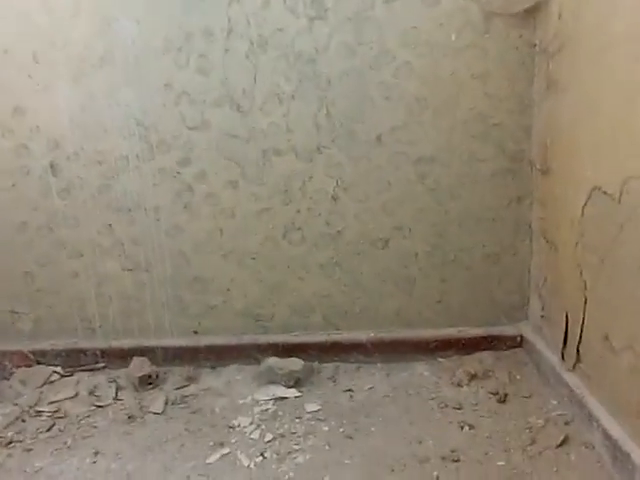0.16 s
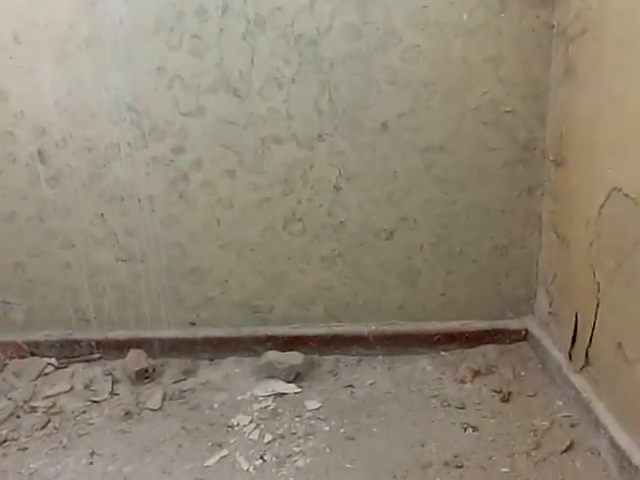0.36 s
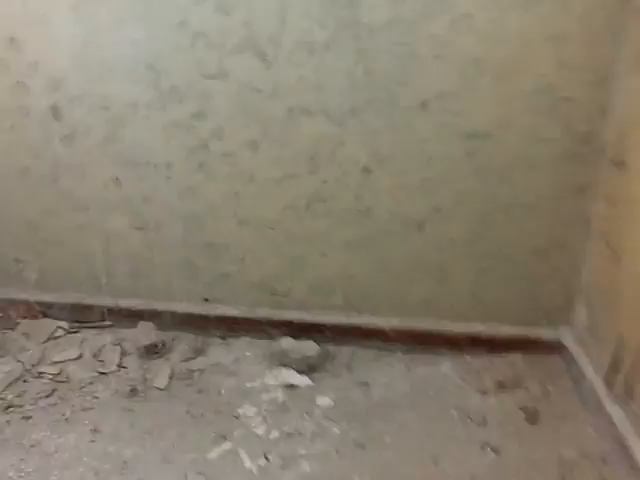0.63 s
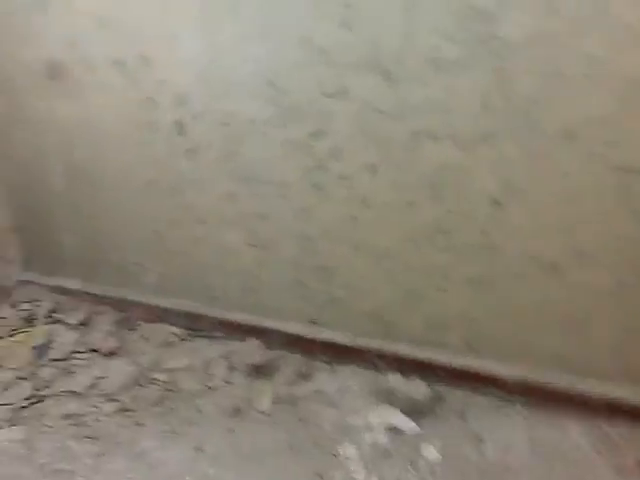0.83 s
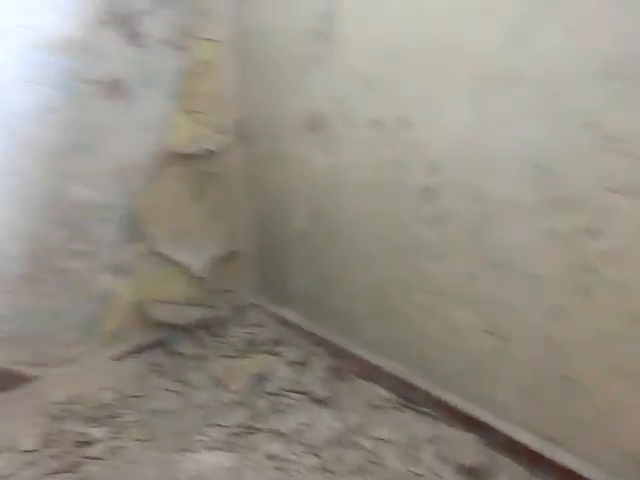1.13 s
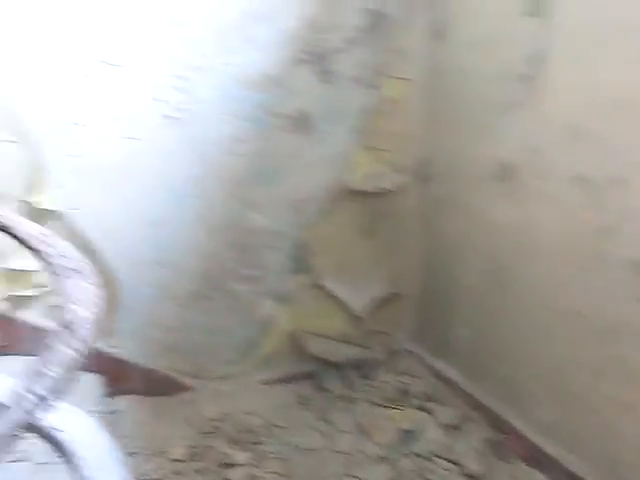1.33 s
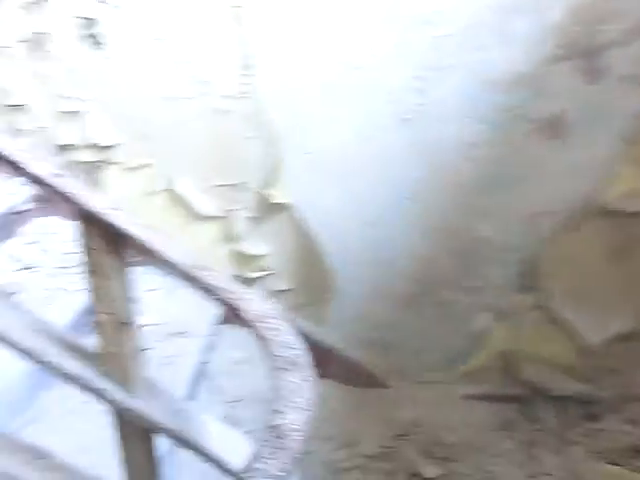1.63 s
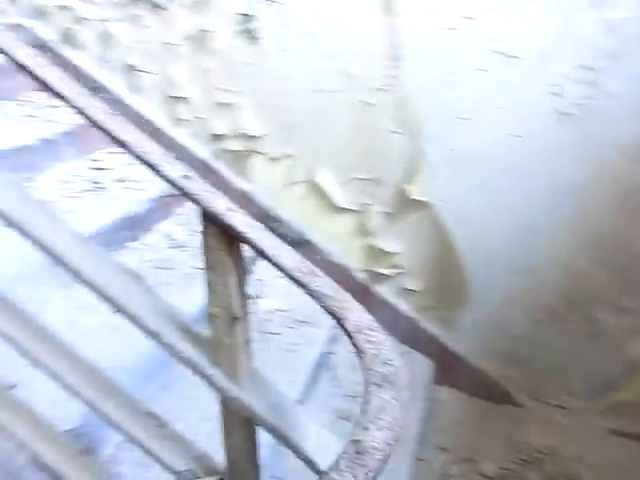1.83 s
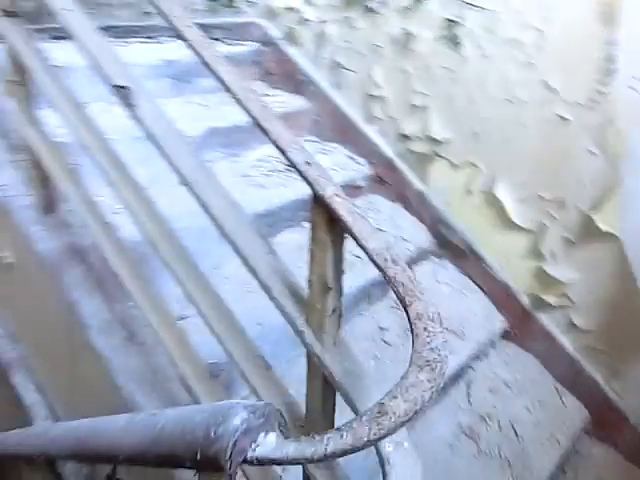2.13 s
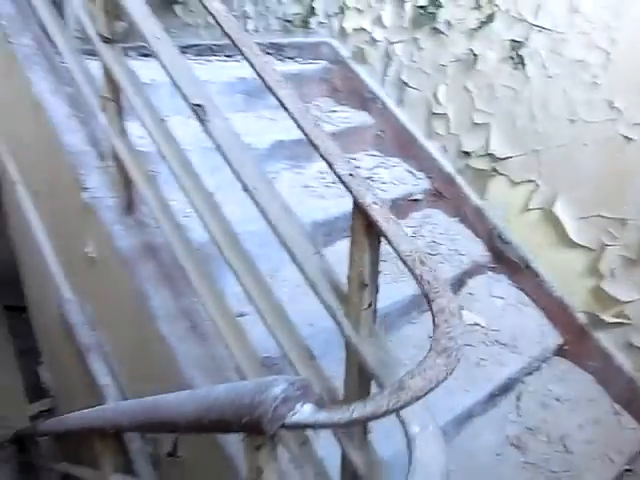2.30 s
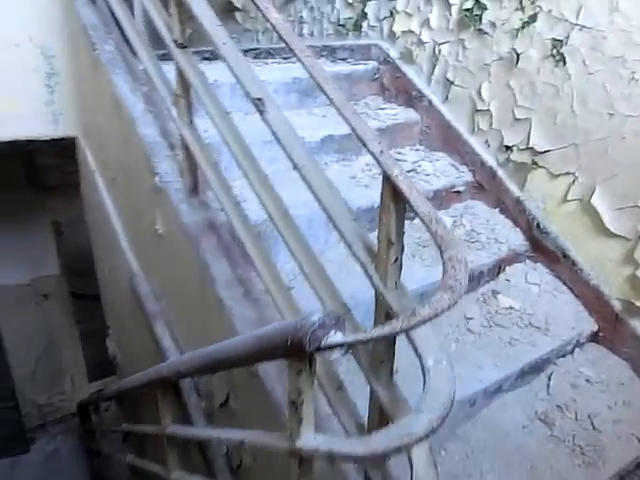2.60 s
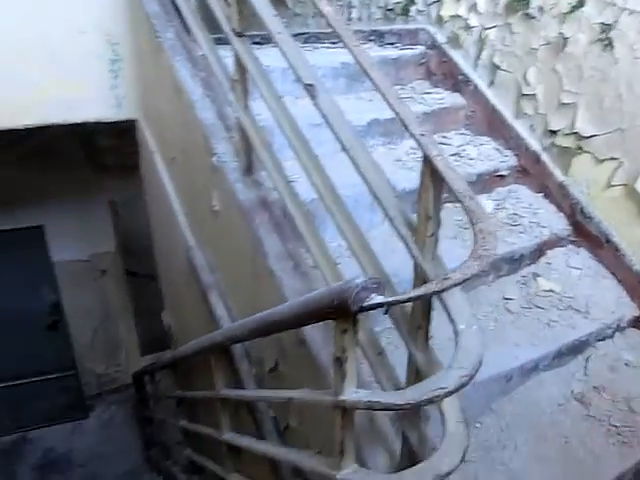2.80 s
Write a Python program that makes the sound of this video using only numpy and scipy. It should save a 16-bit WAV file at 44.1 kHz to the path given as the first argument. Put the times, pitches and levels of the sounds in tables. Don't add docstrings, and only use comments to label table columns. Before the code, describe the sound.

Footsteps on plaster debris: a sharp knock and crunch, a softer tread, then two louder crunching steps, with a bright sleeve swish and tiny squeaks between them, heard close by a handheld stereo microphone in an empty stairwell.

```python
import sys
import numpy as np
from scipy import signal
from scipy.fft import rfft, irfft
from scipy.io import wavfile

SR = 44100
rng = np.random.default_rng(int(sys.argv[2]) if len(sys.argv) > 2 else 0)


def wav_record(signal):
    frames = np.transpose(np.atleast_2d(signal))
    bounded = np.clip(frames, -1, 1)
    quanta = np.round(bounded * 32767).astype(np.int16)
    wavfile.write(sys.argv[1], SR, quanta)


def volts_from_db(level):
    exponent = np.asarray(level, float) / 20
    return 10 ** exponent


N = 130095


def at_hz(points, hz):
    return np.interp(np.log(hz), np.log(np.array(points)[:, 0]), np.array(points)[:, 1])


def over_time(points):
    return np.interp(np.arange(N) / SR, *np.transpose(points))


def rms_one(x):
    return x / np.sqrt(np.mean(x ** 2) + 1e-20)


def band_pass(x, low, high):
    return signal.sosfilt(signal.butter(2, [low, high], "band", fs=SR, output="sos"), x)


def high_pass(x, hz, order):
    return signal.sosfilt(signal.butter(order, hz, "high", fs=SR, output="sos"), x)


def drift(rate_hz):
    r = np.exp(-80 * np.pi * rate_hz / SR)
    white = rng.standard_normal(N // 40 + 2002)
    slow = signal.lfilter([1], [1, -2 * r, r * r], white)[2000:]
    return np.interp(np.arange(N) / 40, np.arange(len(slow)), rms_one(slow))


def ring(clicks, hz, t60):
    r, w = volts_from_db(-60 / (t60 * SR)), 2 * np.pi * hz / SR
    return signal.lfilter([0, np.sin(w)], [1, -2 * r * np.cos(w), r * r], clicks + 1e-18)


def swell(start, rise, hold, t60):
    t = np.arange(N) / SR - start
    fall = volts_from_db(-60 * np.maximum(t - rise - hold, 0) / t60)
    return np.sin(np.pi / 2 * np.clip(t / rise, 0, 1)) ** 2 * fall


def blow(s, db, hz, t60, swell_cycles=1):
    out, t = np.zeros(N + SR), np.arange(SR // 2) / SR
    onset = np.sin(np.pi / 2 * np.minimum(t * hz / swell_cycles, 1)) ** 2
    start = int(s * SR)
    out[start:start + SR // 2] = volts_from_db(db - 60 * t / t60) * np.sin(2 * np.pi * hz * t) * onset
    return out[:N]


EDGES = 20 * 2 ** np.arange(0, 9.7, .4)


def bands(gain, alike, size):
    out, white = 0, rng.standard_normal((2, 2, size))
    for k, (low, high) in enumerate(zip(EDGES, EDGES[1:])):
        mid, side = band_pass(white[k % 2], low, high)
        hz = np.sqrt(low * high)
        c = np.clip(alike(hz), -1, 1)
        out = out + gain(hz) * (np.sqrt(1 + c) * mid + np.sqrt(1 - c) * side * [[1], [-1]])
    return rms_one(out)


# (time [s], peak level [dB], pitch [Hz], ring [cycles])
KNOCKS = [(.281, -55, 606, 3.9), (.3372, -17, 600, 1.94), (0.3383, -5, 1570, 1.41),
          (0.3405, -14, 1620, 1.6), (0.351, -25, 2970, 6.1), (.3555, -26, 2630, 5.5),
          (0.372, -31, 1500, 3.3), (0.376, -32, 2800, 3.7), (.385, -26, 2630, 4), (0.405, -37, 900, 1.6),
          (0.41, -32, 2400, 3.1), (0.552, -34, 480, 1.8), (0.977, -41.5, 966, 10), (.988, -65, 940, 6.5),
          (1.532, -49, 780, 4.9), (1.6195, -3.5, 1120, 0.49), (1.6253, -13, 1490, 2.26),
          (1.6294, -29.5, 1840, 23), (1.652, -38, 553, 3.5), (1.72, -29, 1800, 5.4),
          (1.813, -32, 1740, 5.4), (2.28, -42, 1900, 2.4), (2.297, -27, 1530, 3.2), (2.302, -32, 1160, 2.1),
          (2.312, -24, 1213, 6), (2.316, -17.5, 900, 2.04), (2.328, -18, 2260, 2.06),
          (2.342, -28, 1690, 4.4), (2.399, -30, 1640, 3.3), (2.416, -31, 2420, 6), (2.443, -17, 2000, 2.9),
          (2.452, -15.5, 2220, 3.3), (2.468, -22.5, 1500, 3.9), (2.48, -23.5, 1200, 3),
          (2.76, -40, 2600, 1.8), (1.0, -52, 12500, 37), (2.796, -45, 930, 1.8), (2.879, -33, 763, 5.6),
          (2.903, -36, 800, 2.2)]
# (time [s], peak level [dB])
SNAPS = [
    (0.5331, -29.5),
    (0.5526, -29.5),
    (0.5787, -35),
    (1.1544, -31),
    (1.265, -49),
    (1.287, -37.5),
    (2.376, -28),
]
# (low edge [Hz], high edge [Hz])
SNAP_BAND = [3800, 9500]


def knocks():
    out = 0
    for s, db, hz, cycles in KNOCKS:
        for ratio, up_db in ((1, 6.5), (1.8, -2.5)):
            pitch = hz * ratio
            out = out + blow(s, db + up_db, pitch, 3 * cycles / pitch)
    bright = band_pass(rng.standard_normal(N), *SNAP_BAND)
    snaps = sum(volts_from_db(db - 8.5) * swell(s, rise=0.00083, hold=0, t60=.02) for s, db in SNAPS)
    return out + bright * snaps


# (time [s], peak level [dB], pitch [Hz], fall t60 [s])
THUDS = [(0.338, -53, 142, 0.019), (.974, -39.5, 127, 0.14), (0.977, -30, 240, 0.04),
         (0.988, -59, 320, 0.038), (1.0, -57, 76, 0.76), (1.08, -49, 210, 0.11), (1.619, -30.5, 548, 0.052),
         (2.2932, -26, 360.4, 0.05), (2.332, -31.5, 420, 0.047), (2.69, -51, 431, 0.14),
         (2.8, -50.5, 241, 0.094)]


def thuds():
    return sum(blow(*row, swell_cycles=1.3) for row in THUDS)


# (time [s], level [dB], rise [s], fall t60 [s], centre [Hz])
CRUSHES = [(-.05, -54, 0.037, 0.41, 443), (0.335, -38, 0.003, 0.2, 1750), (0.362, -42, 0.02, 0.1, 2600),
           (.38, -47.5, 0.022, 0.084, 2480), (.52, -56, 0.07, 0.99, 410), (0.976, -44.5, 0.0042, 0.23, 837),
           (1.009, -54, 0.02, 0.2, 3460), (1.109, -54, 0.028, 0.41, 2760), (1.139, -55.5, 0.011, 1, 378),
           (1.609, -33.5, 0.023, 0.32, 1990), (1.69, -45, 0.043, 0.15, 1630),
           (1.772, -45, 0.024, 0.6, 1540), (1.84, -49, 0.041, 0.33, 404), (1.989, -55, 0.038, 0.29, 720),
           (1.8, -51, .02, 0.25, 3800), (1.96, -57.5, 0.045, .5, 2800), (2.33, -42, 0.09, 0.57, 1760),
           (2.393, -36, 0.052, 0.23, 4460), (2.413, -33.5, 0.006, 0.4, 2280),
           (2.456, -34.5, 0.013, 0.22, 2500)]
# (time [s], level [dB], rise [s], fall t60 [s], centre [Hz])
SCUFFS = [
    (0.342, -41, .012, 0.32, 2520),
    (2.287, -36.5, 0.013, 0.3, 900),
    (2.292, -37.5, 0.022, .25, 2100),
    (2.7, -60.5, 0.056, 0.48, 1220),
    (2.79, -57, 0.0088, 0.88, 1470),
    (2.883, -50.5, 0.0074, 1, 1070),
]
BELOW_DB_PER_OCTAVE, CRUSH_ABOVE_DB_PER_OCTAVE, SCUFF_ABOVE_DB_PER_OCTAVE = 6, 5.5, 10.5
GRAINS_PER_S, GRAIN_CYCLES = 14000, 4.0
GRAIN_SPREAD_DB, GRAIN_CAP = 3.2, 3.2


def grit():
    sizes = volts_from_db(GRAIN_SPREAD_DB * np.minimum(rng.exponential(1, N), GRAIN_CAP)) * rng.choice([-1, 1], N)
    clicks = rms_one(sizes * (rng.random(N) < GRAINS_PER_S / SR))
    pitches = np.geomspace(260, 14500, 22)
    chance = np.sqrt(pitches) / np.sqrt(pitches).sum()
    dealt = rng.choice(22, N, p=chance)
    treads = CRUSHES + SCUFFS
    swells = np.array([volts_from_db(db) * swell(s, rise, 0, t60) for s, db, rise, t60, _ in treads])
    above_db = np.repeat([CRUSH_ABOVE_DB_PER_OCTAVE, SCUFF_ABOVE_DB_PER_OCTAVE], [len(CRUSHES), len(SCUFFS)])
    centres = np.array(treads)[:, 4]
    unit = np.arange(SR // 4) == 0
    out = 0
    for k, hz in enumerate(pitches):
        octaves = np.log2(hz / centres)
        octaves -= np.clip(octaves, 0, .4)
        share = volts_from_db(np.where(octaves > 0, -above_db, BELOW_DB_PER_OCTAVE) * octaves - 4.5)
        t60 = GRAIN_CYCLES / hz

        def ring_twice(x):
            return ring(ring(x, hz, t60), hz, t60)

        mine = dealt == k
        rung = ring_twice(clicks * mine * np.sqrt(share ** 2 @ swells ** 2))
        out = out + rung / np.sqrt(np.sum(ring_twice(unit) ** 2) * np.mean(mine))
    return high_pass(out, 240, order=3)


def whistle(rows):
    s, hz, db = np.transpose(rows)
    t = np.arange(N) / SR
    edge = np.clip(np.minimum(t - s[0], s[-1] - t) / 0.003, 0, 1)
    pitch = np.interp(t, s, hz) + 60 * drift(74)
    level = volts_from_db(np.interp(t, s, db) + 6 + 2.6 * drift(130))
    return edge * level * np.sin(2 * np.pi * np.cumsum(pitch) / SR)


# (time [s], pitch [Hz], level [dB])
SQUEAK = [
    [(1.792, 8065, -63), (1.798, 8185, -54), (1.83, 8967, -55), (1.852, 9178, -47), (1.882, 9062, -53),
     (1.914, 8401, -50), (1.925, 8262, -65)],
    [(1.935, 8107, -64), (1.961, 8650, -58), (1.978, 8700, -59), (2.0, 8400, -60), (2.018, 8000, -53),
     (2.028, 7750, -62)],
    [(1.965, 9200, -60), (1.977, 9400, -48), (1.995, 9050, -54), (2.01, 8750, -53), (2.023, 8250, -58)],
]
# (time [s], length [s], from [Hz], to [Hz], level [dB])
SEAMS = [(1.915, .04, 10000, 10300, -62), (1.95, .06, 10350, 9800, -59), (1.918, .03, 7300, 7400, -62),
         (1.87, .05, 14100, 13200, -68), (1.92, .065, 13200, 13900, -69), (2.035, .025, 6700, 6000, -67),
         (2.008, .028, 7350, 6700, -62), (2.055, .037, 9750, 8950, -65), (2.065, .035, 8400, 7600, -69),
         (2.075, .045, 6400, 5000, -69), (1.785, .015, 10300, 11000, -60), (1.825, .05, 6400, 6300, -64),
         (1.84, .04, 10000, 10100, -64), (1.985, .025, 13900, 13000, -68)]


def squeaks():
    seams = sum(whistle([(s, a, db), (s + d, b, db)]) for s, d, a, b, db in SEAMS)
    return sum(whistle(rows) for rows in SQUEAK) + volts_from_db(0.3) * seams


# (time [s], level [dB], rise [s], hold [s], fall t60 [s])
SWISHES = [
    (1.75, -55.5, 0.054, 0.2, 0.3),
    (2.42, -45, 0.053, 0.075, 1),
]
# (frequency [Hz], density [dB per Hz])
FABRIC = [(2350, -47), (4000, -19), (6000, 3), (8000, 2.5), (10400, 9), (12500, -2), (15500, -35)]
# (frequency [Hz], level [dB], width [Hz], fall t60 [s])
WEAVE = [(6850, -62.5, 550, 5.1), (8800, -56.5, 980, 2.5), (10250, -51.5, 1100, 0.89),
         (11900, -68, 1600, 2.15)]


def jacket():
    hiss = bands(lambda hz: volts_from_db(at_hz([(1500, -40)] + FABRIC, hz)), lambda hz: 1, size=N)
    white = rng.standard_normal((2, N))
    weave = 0
    for hz, db, width_hz, t60 in WEAVE:
        band = rms_one(band_pass(white, hz - width_hz / 2, hz + width_hz / 2))
        weave = weave + volts_from_db(db) * swell(2.456, .07, 0.15, t60) * band
    strokes = sum(volts_from_db(db) * swell(s, rise, hold, t60) for s, db, rise, hold, t60 in SWISHES)
    brushing = (hiss * strokes + weave) * volts_from_db(.8 * drift(29))
    squeak = squeaks()
    pan = volts_from_db(-2 * np.array([[.5], [-.5]]))
    return (brushing + [squeak, -np.roll(squeak, 1)]) * pan


# (frequency [Hz], t60 [s])
STAIRWELL = [(100, 1), (400, 0.61), (1500, 0.43), (5000, 0.28), (12000, 0.61)]
# (frequency [Hz], left-right likeness [-1..1])
LIKENESS = [(25, 0.14), (60, 0.77), (200, 0.95), (2000, 0.98), (4000, 0.81), (8000, 0.49), (12000, 0.027)]
ECHO_DB, FIRST_ECHO_S, BUILD_S = -4.5, 0.0011, 0.0014


def likeness(hz):
    return at_hz(LIKENESS, hz)


def stairwell(x):
    t = np.arange(SR) / SR
    echo = bands(lambda hz: volts_from_db(-60 * t / at_hz(STAIRWELL, hz)), likeness, size=SR)
    echo = echo * np.clip((t - FIRST_ECHO_S) / BUILD_S, 0, 1)
    echo *= volts_from_db(ECHO_DB) / np.sqrt(np.mean(np.sum(echo ** 2, axis=1)))
    echo[:, 0] += 1
    return signal.fftconvolve(x[None], echo, axes=1)[:, :N]


# (frequency [Hz], density [dB per Hz])
AIR = [(150, -7.5), (250, -12), (430, -0.5), (900, -9.5), (2000, -6.5), (3300, -17.5), (5000, -12.5),
       (11000, -31), (15500, -39)]
# (time [s], level [dB])
BACKGROUND_LEVEL = [
    (0, 3),
    (1.3, -2.5),
    (1.9, 1),
    (2.201, -4.5),
    (2.6, -4),
]
# (time [s], level [dB], rise [s], hold [s], fall t60 [s], pitch [Hz])
HUM = (2.0, -66, .04, .2, .3, 138)


def air():
    colour = [(90, -44)] + AIR
    room = bands(lambda hz: volts_from_db(at_hz(colour, hz) + 1.3 * drift(0.67)), likeness, size=N)
    s, db, rise, hold, t60, hz = HUM
    hum = volts_from_db(db + 2) * swell(s, rise, hold, t60) * rms_one(ring(rng.standard_normal(N), hz, .1))
    return volts_from_db(-55 + over_time(BACKGROUND_LEVEL)) * room + hum


# (time [s], level [dB])
RUMBLE = [(0.0, -51), (0.32, -63.5), (0.93, -57.5), (1.18, -62), (1.44, -59.5), (1.8, -59), (2.0, -62),
          (2.3, -62), (2.64, -57), (2.95, -57)]


def hand():
    colour = [(20, -4.0), (80, -15.0), (150, -6), (300, -21.5)]   # (frequency [Hz], density [dB per Hz])
    return volts_from_db(over_time(RUMBLE)) * bands(lambda hz: volts_from_db(at_hz(colour, hz)), likeness, size=N)


def scene():
    struck = high_pass(knocks(), 160, order=2)
    echoed = volts_from_db(-4.5)
    steps = echoed * struck + grit() + thuds()
    return stairwell(steps) + (1 - echoed) * struck + jacket() + air() + hand()


def band_limit(x):
    return signal.sosfilt(signal.butter(12, 15750, fs=SR, output="sos"), x)


# (frequency [Hz], left over right [dB])
LEAN = [(100, 2), (500, 1.46), (2000, 1.67), (8000, -.5), (12000, -0.7)]
# (frequency [Hz], left lead [rad])
PORT_PHASE = [(3000, 0.018), (7000, 0.53), (13000, 1)]


def record(dry):
    hz = np.maximum(np.arange(N // 2 + 1) * SR / N, 1)
    half = np.array([[.5], [-.5]])
    level = volts_from_db(at_hz(LEAN, hz) * half)
    phase = np.exp(1j * at_hz(PORT_PHASE, hz) * half)
    top_cut = 1 / (1 + (hz / 15450) ** 120)
    mix = irfft(rfft(dry, axis=1) * level * phase * top_cut, N, axis=1)
    return band_limit(mix)


dry = scene()
out = record(dry)
wav_record(out)
```